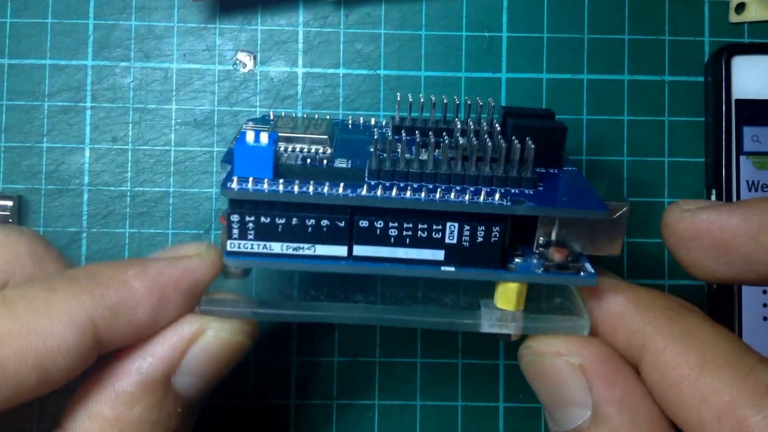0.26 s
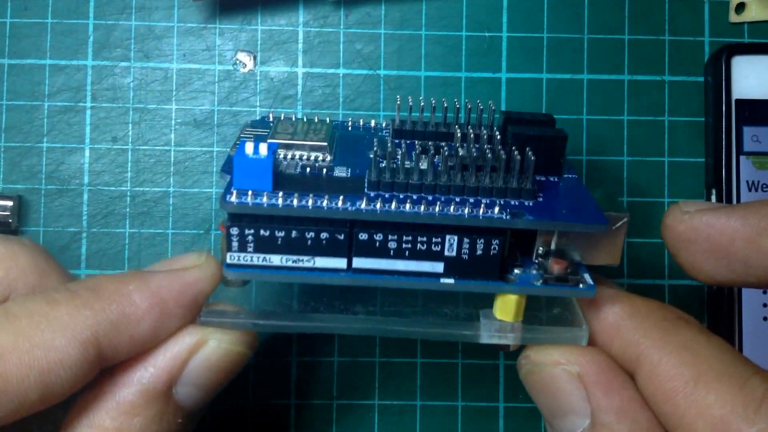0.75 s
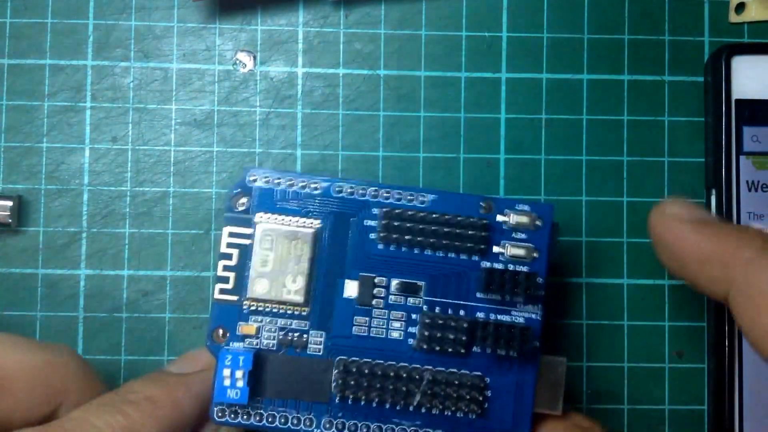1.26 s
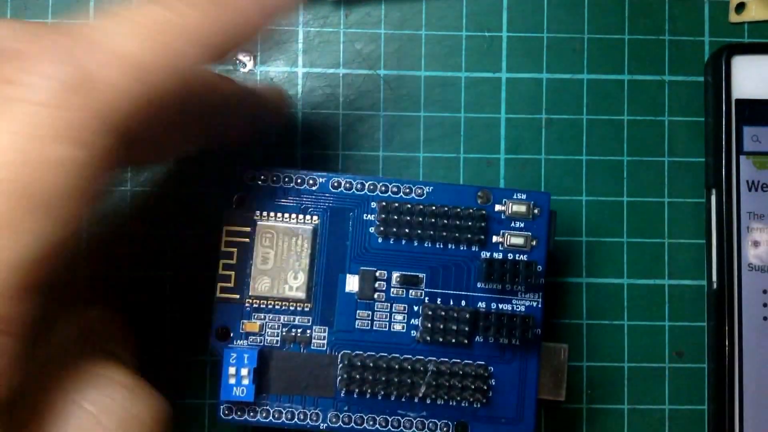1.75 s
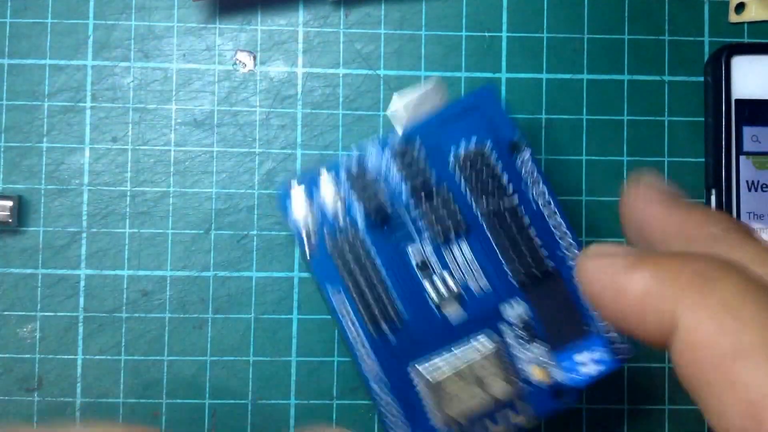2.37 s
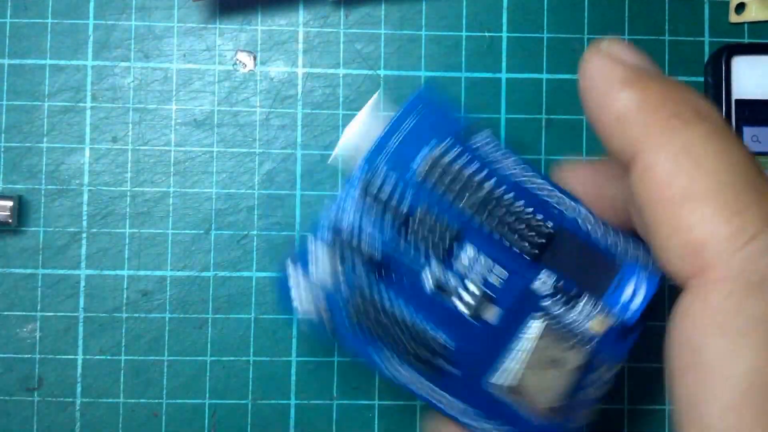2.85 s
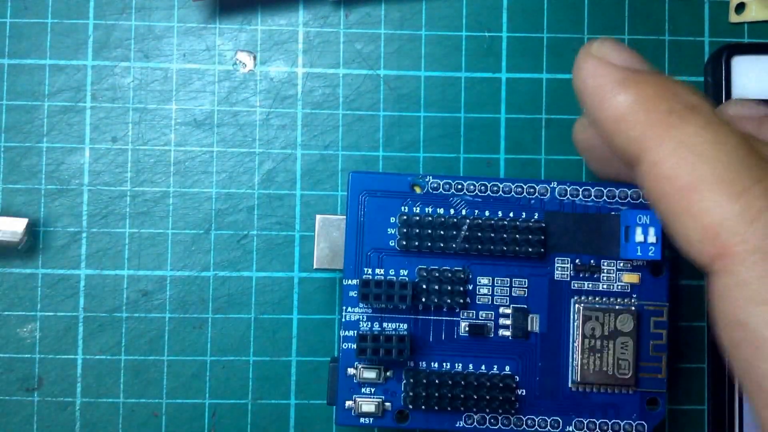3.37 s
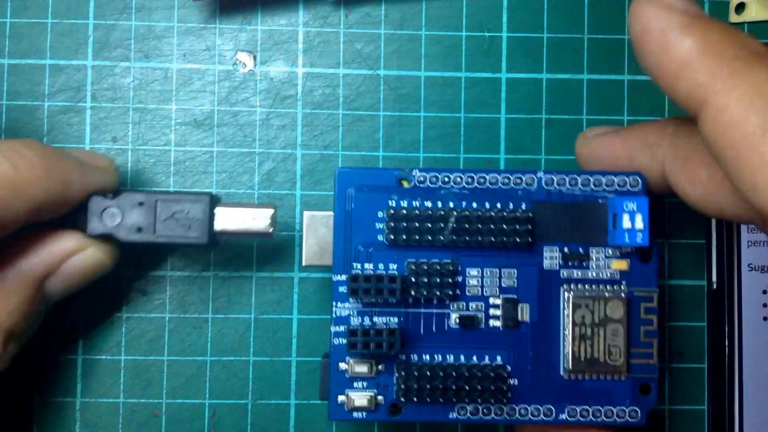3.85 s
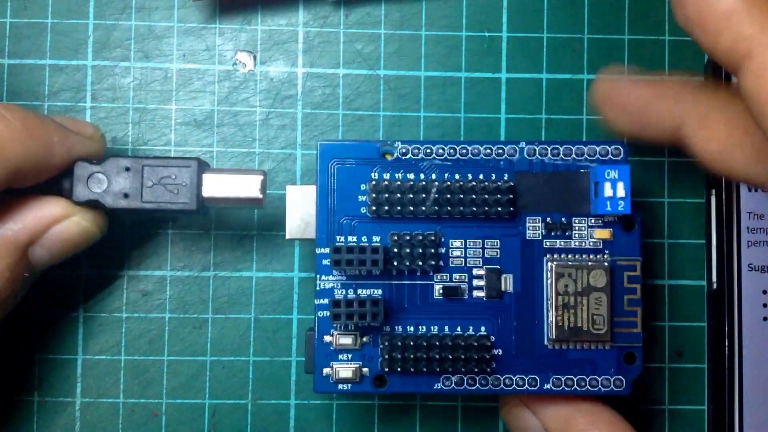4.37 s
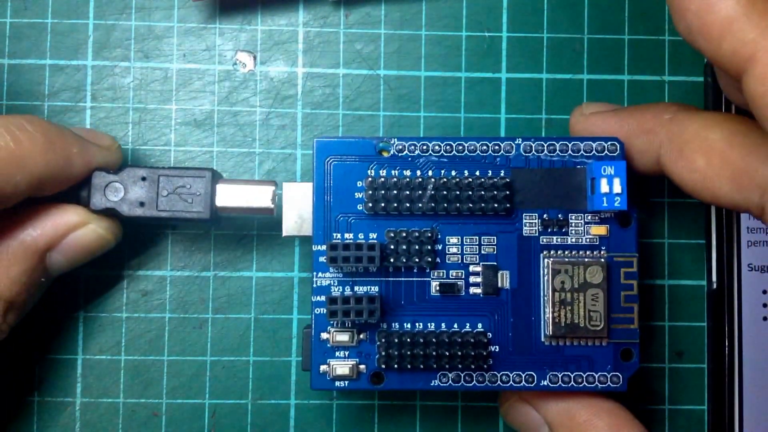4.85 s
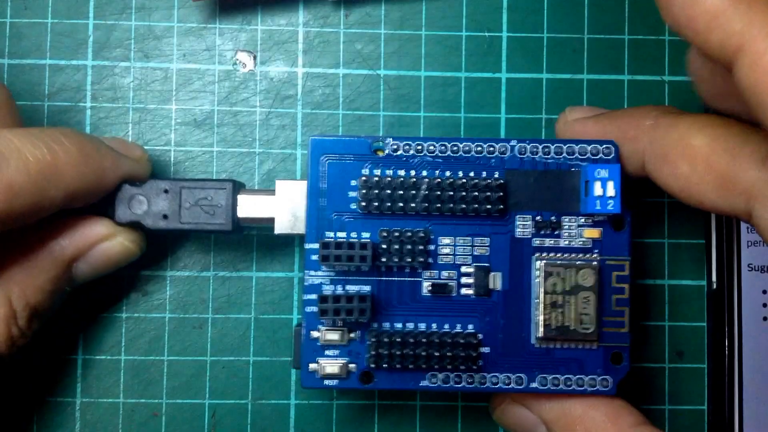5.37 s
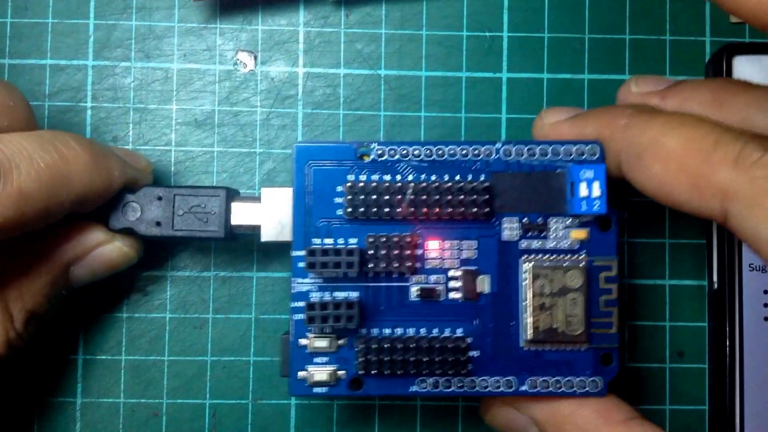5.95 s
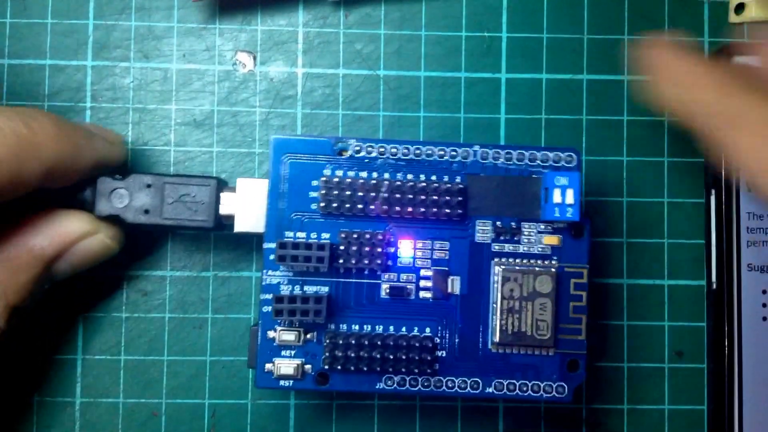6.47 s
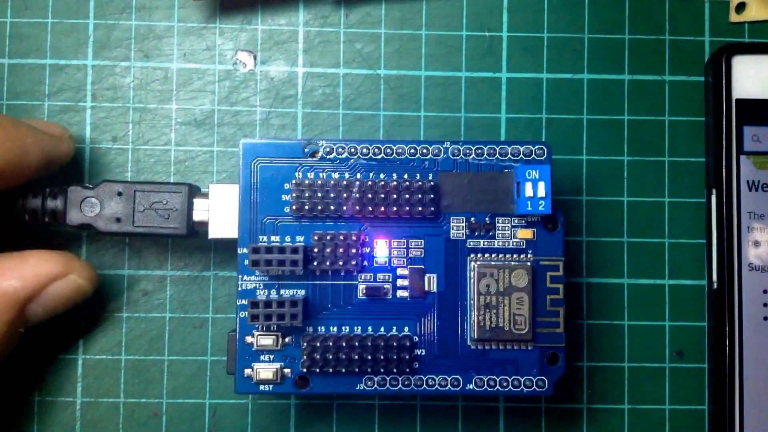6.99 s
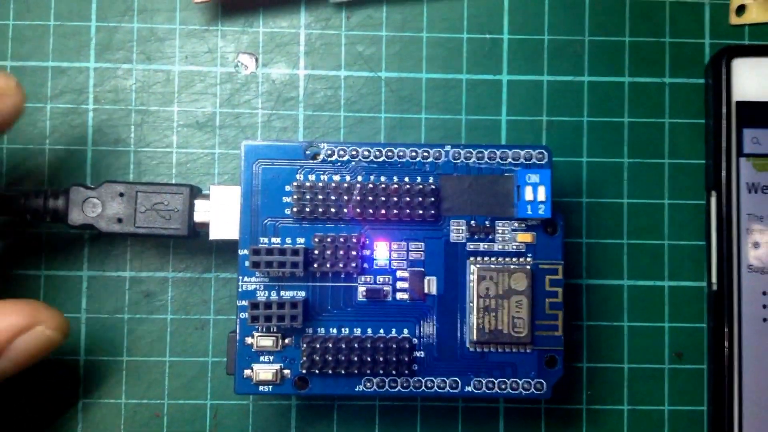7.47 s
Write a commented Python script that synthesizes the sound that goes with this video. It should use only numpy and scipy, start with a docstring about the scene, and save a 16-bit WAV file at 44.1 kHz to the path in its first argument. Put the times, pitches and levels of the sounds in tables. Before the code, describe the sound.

In a small dry room, close to the mat, a low fan hum wavers with soft airy swishes. A circuit board is set down with quick light taps, then turned and slid with gritty scrapes and a hard cluster of knocks, followed by more rubbing. Small ticks come as a cable plug meets the socket, then it snaps home with one loud, bright click. Only the quiet fan remains.

```python
"""Circuit board on a cutting mat, plug snapping home

A small, dry room, with the microphone close to the mat. A fan gives a low, wavering tone, bands of noise
and soft swishes. A circuit board is set down, turned and slid: knocks, taps and scuffs are short contacts
that ring its resonances, its slides are dense tiny slips, its pins hiss. Fingers and a cable plug tick on
small hard parts; the plug is pushed and snaps home with one sharp click that rings plug and socket.
The nearest walls echo briefly.
"""
import sys
import numpy as np
from scipy import signal
from scipy.fft import rfft, irfft
from scipy.io import wavfile
from scipy.ndimage import uniform_filter1d, map_coordinates

SR = 44100
rng = np.random.default_rng(int(sys.argv[2]) if len(sys.argv) > 2 else 0)


def bounce(signal):
    """Save signal as a 16-bit WAV file at the path given by the first command-line argument."""
    frames = np.transpose(np.atleast_2d(signal))
    limited = np.clip(frames, -1, 1)
    pcm = np.round(limited * 32767).astype(np.int16)
    wavfile.write(sys.argv[1], SR, pcm)


N = 340692
TIME = np.arange(N) / SR
FREQS = np.fft.rfftfreq(N, 1 / SR)

# colour of the fan's wash and swishes: (frequency [Hz], relative density [dB per Hz])
SWELL_COLOUR = [(300, -27), (680, 5), (820, 6.5), (1250, 7), (1600, -4.5), (2600, -33), (6000, -62)]


def gain_of(db):
    """Decibels to amplitude."""
    return 10 ** (np.asarray(db) / 20)


def evened(x):
    """Scales to rms 1."""
    return x / np.sqrt(np.mean(x ** 2) + 1e-20)


def unit(x):
    """Scales to energy 1."""
    return x / np.linalg.norm(x)


def read(points, hz):
    """Reads a spectrum table on a log-frequency axis."""
    f, value = np.transpose(points)
    return np.interp(np.log(hz + 1), np.log(f + 1), value)


def add(mix, s, sound):
    """Mixes a sound in at time s."""
    part = mix[round(s * SR):][:len(sound)]
    part += sound[:len(part)]


def coloured(x, gain):
    """Filters a full-length signal; rms 1."""
    return evened(irfft(rfft(x) * gain, N))


def coloured_noise(gain):
    """Full-length noise with the given spectrum; rms 1."""
    return coloured(rng.standard_normal(N), gain)


def waver(rate_hz):
    """Slow chance up to a given rate; rms 1."""
    return coloured_noise(np.exp(-(FREQS / rate_hz) ** 2))


def causal(x, db_at, size=4096):
    """Filters by a gain in dB over frequency, with nothing ahead of the attack (minimum phase)."""
    log_gain = np.log(gain_of(db_at(abs(np.fft.fftfreq(size, 1 / SR)))))
    taps = np.fft.ifft(np.exp(np.conj(signal.hilbert(log_gain)))).real
    return signal.fftconvolve(x, taps[:size // 2])[:len(x)]


def treble(hz, bright_hz=3970):
    """Share (0-1) of a frequency in the range that only hard contact excites."""
    return 1 - 1 / (1 + (hz / bright_hz) ** 16)


def tilted(tilt_db):
    """A slope in dB per octave above 1 kHz, set by the hardness of the touch."""
    return lambda hz: tilt_db * np.log2(np.maximum(hz, 1000) / 1000)


def favour(x, hz, lift_db, octaves):
    """Lifts one range of a sound and keeps its energy."""
    lifted = causal(x, lambda f: lift_db / (1 + (np.log2((f + 1) / hz) / octaves) ** 2))
    return np.linalg.norm(x) * unit(lifted)


def air(hiss_db=-69.0, wash_db=-77.5, restless_db=2, restless_hz=3):
    """Steady hiss and a soft, restless wash; the recorder's gain control ducks both after the loud snap."""
    # room air and microphone hiss: (frequency [Hz], relative density [dB per Hz])
    hiss_colour = [(20, -19), (50, -20), (80, -3), (150, 4.5), (290, 5), (340, 1.5), (550, 0.5),
                   (670, -9.5), (1150, -9.5), (1750, -11), (2600, -10.5), (3500, -12), (5200, -17.5),
                   (15000, -21)]
    duck_s, duck_length_s, duck_db = 6.32, 0.39, -2.5  # a set ramp, then held
    ducking = gain_of(duck_db * np.clip((TIME - duck_s) / duck_length_s, 0, 1))
    hiss = gain_of(hiss_db) * coloured_noise(gain_of(read(hiss_colour, FREQS)))
    wash_gain = gain_of(wash_db + restless_db * waver(restless_hz))
    wash = wash_gain * coloured_noise(gain_of(read(SWELL_COLOUR, FREQS)))
    return ducking * (hiss + wash)


def fan_hiss(hz=2050, width_hz=170, restless_db=3.0, restless_hz=4, level_db=-81.0):
    """A faint, diffuse band of hiss in the fan's air comes and goes."""
    band = coloured_noise(1 / (1 + (1.4 * (FREQS - hz) / width_hz) ** 2))
    return gain_of(level_db) * evened(band * gain_of(restless_db * waver(restless_hz)))


def fan():
    """Narrow bands of turbulence make a restless hum."""
    # the fan's hum beside its main tone: (frequency [Hz], width [Hz], level [dB rms])
    bands = [(65.62, 2.7, -85), (102.3, 4, -72.5), (116.9, 3.7, -70), (163, 6.5, -80.5), (182, 6, -78.5),
             (200, 16, -72.5), (233.3, 44, -66), (263, 18, -63), (379, 5.9, -83.5), (498, 4, -86.5),
             (550, 10, -85), (805, 24, -83.5), (925, 15, -98), (1160, 16, -85.5), (1345, 24.6, -84.5),
             (1540, 70, -87.5)]
    power = 0
    for hz, width, db in bands:
        shape = unit(1 / (1 + (1.4 * (FREQS - hz) / width) ** 2))
        power = power + gain_of(db) ** 2 * shape ** 2
    phases = np.exp(2j * np.pi * rng.random(len(FREQS)))
    return np.sqrt(power.sum()) * evened(irfft(np.sqrt(power) * phases, N))


def drone(hz=222, wander_hz=3.7, wander_rate_hz=14, flutter=0.37, flutter_hz=14, level_db=-3.0):
    """The fan's strongest tone, unsteady in pitch and strength."""
    # its slow wavering, ahead of the trim level_db: (time [s], level [dB])
    wavering = [(0.15, -50), (0.5, -55.5), (0.8, -49), (1.05, -56), (1.45, -49.5), (1.9, -54), (2.3, -48.5),
                (2.75, -60), (3.1, -50.5), (3.6, -56), (3.998, -53.5), (5.0, -51), (5.8, -53), (6.4, -52.5),
                (6.8, -57), (7.2, -51)]
    phase = 2 * np.pi * np.cumsum(hz + wander_hz * waver(wander_rate_hz)) / SR
    level = gain_of(level_db + np.interp(TIME, *np.transpose(wavering)))
    return level * evened((1 + flutter * waver(flutter_hz)) * np.sin(phase))


def swishes(half_s=0.057, fall_octaves_per_s=1.8):
    """Each sweep of the fan is a soft midrange swell that falls in pitch as it passes."""
    # mostly about 0.44 s apart: (time of the peak [s], level [dB])
    sweeps = [(.04, -68.5), (.52, -68), (.92, -70.5), (1.35, -69), (1.8, -69.5), (2.66, -72.5),
              (3.1, -72.5), (3.55, -68.5), (3.98, -70), (4.42, -71), (4.86, -69), (5.3, -69), (5.72, -72.5),
              (6.57, -76), (7.03, -71), (7.46, -69)]
    out = np.zeros(N)
    t = np.arange(-SR // 4, SR // 4) / SR
    for s, db in sweeps:
        hz, times, z = signal.stft(rng.standard_normal(len(t)), SR, nperseg=1024)
        sunk_hz = hz[:, None] * 2 ** (fall_octaves_per_s * (times + t[0]))
        noise = signal.istft(z * gain_of(read(SWELL_COLOUR, sunk_hz)), nperseg=1024)[1][:len(t)]
        swish = evened(noise) * np.exp(-(t / half_s) ** 2 / 2)
        add(out, max(s + t[0], 0), gain_of(db) * swish[s + t >= 0])
    return out


def room(x, tail_db=-24, wall_spread_s=0.0027):
    """Clusters of echoes from the nearest walls over a short tail; each band dies at its own speed."""
    # room decay: (frequency [Hz], time to fall 60 dB [s])
    decay = [(200, .3), (1000, 0.24), (3500, 0.2), (5600, 0.226), (10000, 0.2257), (15000, 0.16)]
    # echoes from the nearest walls: (delay [s], level [dB])
    walls = [(.016, -26), (0.032, -33.5), (.054, -41)]
    t = np.arange(SR // 2) / SR
    hz, times, z = signal.stft(rng.standard_normal(len(t)), SR, nperseg=256)
    fading = gain_of(-60 * times / read(decay, hz)[:, None])
    tail = signal.istft(z * fading, SR, nperseg=256)[1][:len(t)]
    response = gain_of(tail_db) * unit(tail * np.minimum(t / .006, 1))  # the tail builds up over 6 ms
    for s, db in walls:
        cluster = rng.standard_normal(len(t)) * np.exp(-((t - s) / wall_spread_s) ** 2 / 2)
        response = response + gain_of(db) * unit(cluster)
    return signal.fftconvolve(x, response)[:N]


def strokes(brake_law=1.88):
    """Each push speeds the board up evenly and brakes it; yields speed and braking (0-1) and its levels."""
    # pushes over the mat: (start [s], time to top speed [s], time to rest [s], level at top speed [dB],
    # weight of the lows [dB], weight of the treble [dB], hiss of the pins at top speed [dB])
    pushes = [(1.055, 0.014, .06, -68, 11.5, 1, -88), (1.275, 0.02, 0.13, -64.5, 4, 2, -81),
              (1.389, 0.037, 0.27, -71.5, 14, 2, -71), (1.84, 0.062, 0.075, -69.5, 11, 10, -79),
              (1.91, 0.061, 0.13, -50.5, -1, -8, -60), (1.96, 0.19, 0.25, -46.5, 2, 0, -56),
              (2.07, .08, 0.063, -53, -10, -10, -70), (2.224, 0.026, 0.076, -69, 19, 15, -82),
              (2.403, 0.029, 0.081, -46.5, 3.5, -2, -61), (2.786, 0.095, 0.12, -48, 2, -4, -52),
              (2.89, 0.061, 0.1, -45.5, 2.5, -4, -70), (3.369, 0.01, 0.026, -58, 8, -5, -72),
              (3.3, 0.074, 0.51, -72, 12, -1, -77), (5.0, 0.031, 0.28, -74, 6, -3, -85)]
    for start, rise, fall, *levels in pushes:
        pushing = np.clip((TIME - start) / rise, 0, 1)
        braking = np.clip((TIME - start - rise) / fall, 0, 1)
        # a law over 1 drops the speed fast at first, then the board creeps to rest
        yield pushing * (1 - braking) ** brake_law, braking, *levels


def catches(let_go_s=0.0047):
    """Gain of the drag: it changes briefly at some moments, mostly a surge that quickly lets go."""
    # pins and mat: (time [s], level against the steady drag [dB])
    snags = [(1.9647, 0), (2.0655, 2), (2.1174, 4.5), (2.1408, 5.5), (2.1836, 6.5), (2.2251, 3.5),
             (2.4187, -2), (2.8218, 5.5), (2.8527, 2), (2.8866, 2), (2.9295, 0)]
    return 1 + sum((gain_of(db) - 1) * (TIME >= s) * np.exp(-abs(TIME - s) / let_go_s) for s, db in snags)


def patches(depth_db, x, size=10, order=7):
    """Lets the spectrum shift in random patches, as the point of contact wanders."""
    z = signal.stft(x, nperseg=256)[2]
    field = uniform_filter1d(rng.standard_normal(z.shape), size, 1)  # smooth over time
    field = evened(uniform_filter1d(field, order, 0))  # and over frequency
    return evened(signal.istft(z * gain_of(depth_db * field), nperseg=256)[1][:N])


def drifting(x, share, rate_hz):
    """Lets all resonances drift by a small share of their frequency, as the grip changes."""
    return map_coordinates(x, [np.cumsum(1 + share * waver(rate_hz))], order=3, mode="wrap")


def rubbing(slips_per_s=2600, smooth=0.8, judder_db=0.74, judder_hz=120, heavy_hz=1700, wander_db=2.0,
            drift=.012, drift_hz=9, speed_law=1.01):
    """Tiny slips on the mat's grain sound through the board; pressure deepens, sharp edges brighten them."""
    # colour of the rubbing: (frequency [Hz], relative density [dB per Hz])
    colour = [(100, 0), (350, -1.5), (650, -7.5), (950, 2), (1400, -1), (1900, 0.5), (2700, 1.5),
              (3800, -3.5), (4300, -8.5), (6000, -19), (9500, -21.5), (12700, -21), (15000, -18)]
    # peaks and dips on that colour: (frequency [Hz], width [Hz], height [dB])
    peaks = [(893, 47, 4.5), (1147, 36, 8), (1340, 320, -8.5), (2910, 180, 6), (3620, 100, 2.5),
             (4370, 300, -0.5), (4850, 140, 11), (5510, 220, 10), (5760, 300, -3), (6200, 200, 7),
             (6660, 320, -3), (7360, 530, 15), (8000, 170, -5), (8720, 460, 13.5), (9550, 190, 12),
             (10400, 400, -0.5), (10550, 300, 10), (11900, 280, 12), (13305, 660, -8)]
    sizes = gain_of(2.6 * np.minimum(rng.exponential(1, N), 4))
    slips = (rng.random(N) < slips_per_s / SR) * rng.choice([-1, 1], N) * sizes
    colour_db = read(colour, FREQS)
    for hz, width, db in peaks:
        colour_db = colour_db + db / (1 + (2 * (FREQS - hz) / width) ** 2)
    friction = patches(wander_db, evened(slips) + smooth * rng.standard_normal(N))
    scrape = drifting(coloured(friction, gain_of(colour_db)), drift, drift_hz)
    lows = irfft(rfft(scrape) / (1 + (FREQS / heavy_hz) ** 4), N)
    highs = irfft(rfft(scrape) * treble(FREQS), N)
    drag = 0
    for speed, _, db, lows_db, highs_db, _ in strokes():
        weighted = scrape + lows * (gain_of(lows_db) - 1) + highs * (gain_of(highs_db) - 1)
        drag = drag + gain_of(db) * speed ** speed_law * weighted  # friction grows with speed
    return drag * catches() * gain_of(judder_db * waver(judder_hz))


def pins(speed_law=0.27, lift_db=19):
    """The pins hiss on the mat even at a crawl, and fade as the board brakes and they lift off."""
    # bands of their hiss: (frequency [Hz], width [Hz], relative level [dB])
    bands = [(2770, 530, -5.5), (3640, 170, -10)]
    hiss = 0
    for hz, width, db in bands:
        hiss = hiss + gain_of(db) * coloured_noise(1 / (1 + (2.0 * (FREQS - hz) / width) ** 2))
    level = sum(gain_of(pins_db - lift_db * braking) * speed ** speed_law
                for speed, braking, *_, pins_db in strokes())
    return hiss * level


def grazes():
    """Short, light strokes: friction noise in a single resonance."""
    # fingers and pins: (time of the middle [s], length [s], level [dB], resonance [Hz], width [Hz])
    light_strokes = [(1.079, 0.034, -65.5, 2250, 900), (1.09, 0.077, -69, 980, 500),
                     (1.223, .06, -73.5, 2750, 800), (1.3, 0.047, -65, 2930, 440),
                     (1.847, .01, -67.5, 3140, 900), (1.88, .08, -68, 3550, 200),
                     (1.902, 0.022, -77, 4600, 1800), (1.944, .03, -60, 2900, 1000),
                     (2.143, 0.015, -55, 4500, 900), (2.257, 0.029, -50.5, 1300, 700),
                     (2.278, .03, -61, 4580, 800), (2.3, .06, -61, 3640, 300),
                     (2.797, 0.018, -59.5, 2800, 800), (2.83, 0.022, -55, 3070, 1200),
                     (2.92, .11, -57, 4850, 450), (2.991, .025, -55.5, 2700, 1600),
                     (3.342, 0.015, -66, 830, 250), (3.385, 0.02, -66, 2060, 1100),
                     (3.387, .02, -63, 800, 160), (3.545, .03, -72, 1650, 500),
                     (3.6, .05, -79, 10000, 5000), (4.51, 0.12, -74, 2670, 1700),
                     (5.044, 0.087, -78, 3670, 4000), (6.12, 0.045, -68.5, 1250, 600),
                     (6.15, 0.028, -66, 2140, 2420), (6.47, .014, -77, 3630, 900),
                     (6.74, .07, -79, 2180, 250)]
    out = np.zeros(N)
    for s, length, db, hz, width in light_strokes:
        t = np.arange(-2 * length, 2 * length, 1 / SR)
        resonance = signal.iirpeak(hz, hz / width, fs=SR)
        hiss = signal.filtfilt(*resonance, rng.standard_normal(len(t)), padlen=0)
        add(out, s + t[0], gain_of(db) * evened(hiss) * np.exp(-(2 * t / length) ** 4))
    return out


def burst(contact_s, t60, rattle, size):
    """A very short contact and a brief chatter of the two surfaces, its spectrum roughly evened out."""
    t = np.arange(size) / SR
    contact, chatter = rng.standard_normal((2, size))
    x = unit(contact * np.exp(-(t / contact_s) ** 2)) + rattle * unit(chatter * gain_of(-60 * t / t60))
    power = uniform_filter1d(abs(np.fft.fft(x)) ** 2, size=25, mode="wrap")
    return causal(x, lambda f: -10 * np.log10(power + .2 * power.mean()), size=size)


def blow(modes, colour, contact_s, crack_db, crack_t60, rattle, tone_db, detune, ring=1, size=8192):
    """One contact: a spike and its chatter drive the part's resonances; ring scales how long they last."""
    f = abs(np.fft.fftfreq(size, 1 / SR))
    power = 0
    for hz, db, t60 in modes:
        centre = hz * (1 + detune * rng.normal())
        half_width = np.log(1000) / (2 * np.pi * t60 * ring)  # a longer ring is a narrower peak
        resonance = 1 + ((f ** 2 - centre ** 2) / (2 * centre * half_width)) ** 2
        power = power + (gain_of(db) * t60) ** 2 / resonance
    crack = gain_of(crack_db) * unit(gain_of(read(colour, f)))
    body = np.hypot(unit(np.sqrt(power)), crack)
    strike = burst(contact_s, crack_t60 * ring, rattle, size)
    sound = causal(strike, lambda hz: 20 * np.log10(body) + tone_db(hz), size=size)
    return unit(sound) * np.sqrt(SR / 200)  # the energy of 5 ms at rms 1


def knocks(thud_hz=1300, lift_octaves=0.26):
    """Knocks, taps and scuffs ring the board: some drive the low modes, fingers damp the ring."""
    # contacts: (time [s], level [dB], treble from hard contact [dB], weight of the low thud [dB],
    # range that the struck spot favours [Hz], its lift [dB], relative ring time)
    contacts = [(1.4159, -39.5, -22, 1, 2630, 6, .45), (1.4427, -37, 0.5, 4, 2980, 13, 0.78),
                (1.4463, -38, -11.5, 1.5, 2900, -1, 0.67), (1.4508, -45.5, -19, 7, 1500, 2, 0.52),
                (2.159, -44, -7, 6, 2965, 6, .8), (2.2485, -45, -16.5, 16, 1300, 11, 1.8),
                (2.257, -44, -16, 17, 590, 15, 2.5), (2.3567, -29.5, -7.5, 7, 2800, 8, 1.5),
                (2.3622, -28.5, -1.5, 24, 3740, 12.5, 1.4), (2.3653, -31, -8, 14, 790, 19, 0.8),
                (2.3772, -33.5, -7, 7, 3170, 7, 1.16), (2.3850, -43.5, 3, 11, 890, 11, 0.75),
                (2.930, -46.5, -8, -10, 2700, 12, .8), (2.9432, -48, -3, 3, 4700, 21, .7),
                (2.9565, -43, -16, 5, 2150, 12, 0.8), (2.977, -46, -8, -8, 2300, 9, 1.2),
                (3.3735, -52.5, -16, 5, 820, 16, 1.9), (3.444, -54, -14, 6, 790, 25, 1.4),
                (4.4160, -41, -12.5, -2, 1950, 8, 0.56), (4.4190, -46.5, -12, 13, 960, 10, .8),
                (4.4226, -49, -12, 10, 510, 11, 1.1), (6.3404, -54.5, -24, -3, 2800, -1, 0.75)]
    # what the board rings with: (frequency [Hz], relative level [dB], nominal time to fall 60 dB [s])
    board_modes = [(216, -6, 0.22), (374, -5.5, 0.068), (510, 2, 0.02), (602, -12, 0.12), (787, -4, 0.033),
                   (906, -1, 0.044), (1125, -3, 0.083), (1697, 4, 0.027), (1980, -13, 0.054),
                   (2210, -0.5, 0.041), (2830, 4.5, 0.022), (3570, 2.5, 0.031), (4970, 0, 0.037),
                   (7350, -3, 0.044), (8800, 1, 0.028)]
    # first crack of contact: (frequency [Hz], relative level [dB])
    crack = [(100, 2), (400, -14), (1000, -26), (1400, -5), (2800, 3.5), (3800, -3), (5800, -3),
             (8700, -10), (10500, -17.5), (15000, -26)]
    out = np.zeros(N)
    for s, db, hard_db, thud_db, spot_hz, lift_db, ring in contacts:
        modes = [(hz, level + thud_db * (hz < thud_hz), t60) for hz, level, t60 in board_modes]
        knock = blow(modes, crack, contact_s=0.00058, crack_db=-4.0, crack_t60=0.035, rattle=0.69,
                     tone_db=lambda f: hard_db * treble(f), detune=0.019, ring=ring)
        add(out, s, gain_of(db) * favour(knock, spot_hz, lift_db, lift_octaves))
    return out


def touches(lift_octaves=0.12):
    """Fingers and plug: light ticks on small hard parts; in each, one resonance stands out."""
    # the tick at 4.4168 s belongs to a tap on the board: (time [s], level [dB],
    # treble tilt [dB per octave], resonance that stands out [Hz], its lift [dB])
    ticks = [(1.285, -55.5, 8, 2950, 25), (4.4168, -54, 3, 4750, 17), (4.9975, -43, -1, 4950, 18),
             (4.9982, -42.5, -3, 1520, 11), (5.0012, -54, -2, 850, 21), (5.032, -65, -4, 2650, 18),
             (5.125, -58, -8, 1720, 5), (5.127, -58, -9, 950, 10), (5.143, -68, 9, 10000, 19),
             (5.447, -67.5, 4, 7400, 7), (6.015, -62, 3, 3620, 7)]
    # what the small parts ring with: (frequency [Hz], relative level [dB], time to fall 60 dB [s])
    small_modes = [(1484, -3, 0.016), (1610, 5, 0.016), (2290, 0, 0.012), (2904, -1, .01),
                   (3560, -0.5, 0.036), (4600, -1, 0.0096), (4950, -12, 0.014), (5445, -7.5, 0.037),
                   (7930, -13, 0.018), (8580, -6, .013)]
    # first crack of contact: (frequency [Hz], relative level [dB])
    crack = [(100, -40), (900, -15), (1400, -3), (2800, 1), (5600, -19), (6500, -9), (12500, -12),
             (15000, -18)]
    out = np.zeros(N)
    for s, db, tilt_db, hz, lift_db in ticks:
        tick = blow(small_modes, crack, contact_s=.001, crack_db=-6.5, crack_t60=0.016, rattle=1.5,
                    tone_db=tilted(tilt_db), detune=0.0017)
        add(out, s, gain_of(db) * favour(tick, hz, lift_db, lift_octaves))
    return out


def plug(spray_db=5, spray_dull_db=0.7):
    """The plug slips past the springs, hits home and rebounds; returns near sound and spray to the room."""
    # scrape, snap and rattle: (time [s], level [dB], treble tilt [dB per octave])
    contacts = [(6.1619, -41, 1.5), (6.1632, -26.5, 5), (6.1642, -12, 1), (6.1672, -28.5, 4),
                (6.1692, -32, -1), (6.1785, -42, 2), (6.182, -41, -1), (6.187, -46.5, 1),
                (6.202, -48.5, -2)]
    # plug and socket as they lock: (frequency [Hz], relative level [dB], time to fall 60 dB [s])
    shell_modes = [(295, -22, 0.035), (790, -18.5, 0.03), (991, -13, 0.05), (1220, -17, 0.042),
                   (1600, -11, 0.044), (1720, -13, .026), (2080, -9.5, 0.027), (2803, -3.5, 0.014),
                   (3332, 1.5, 0.013), (3560, -2.5, 0.031), (4240, -4, 0.012), (4720, -3, .014),
                   (5200, -2, 0.012), (5400, -4.5, 0.024), (5840, -7.5, 0.017), (6577, -4.5, .012),
                   (7600, -4, 0.011), (8340, 0.5, 0.0072), (9290, -6.5, 0.012), (9940, -3, 0.014),
                   (10890, -15.5, 0.045), (11040, -11.5, 0.03), (13100, -5, 0.0072), (14300, -7.5, .012)]
    # first crack of contact: (frequency [Hz], relative level [dB])
    crack = [(100, -30), (450, -14.5), (1400, 2), (3400, -1.5), (6000, -8), (10000, -6), (12200, -3),
             (15000, -1.5)]
    near, far = np.zeros(N), np.zeros(N)
    for s, db, tilt_db in contacts:
        click = blow(shell_modes, crack, contact_s=.0017, crack_db=-7.5, crack_t60=0.016, rattle=0.98,
                     tone_db=tilted(tilt_db), detune=0.0012)
        add(near, s, gain_of(db) * click)
        # other directions receive another mix of the modes, with more of the crack
        spray = blow(shell_modes, crack, contact_s=0.0009, crack_db=spray_db, crack_t60=0.028, rattle=2.2,
                     tone_db=tilted(tilt_db - spray_dull_db), detune=.015)
        add(far, s, gain_of(db) * spray)
    return near, far


def scene(low_hz=150):
    """Board, plug and fan in the room; such small parts radiate hardly any bass."""
    background = drone() + fan() + swishes() + fan_hiss() + air()
    handling = knocks() + rubbing() + pins() + grazes() + touches()
    snap, spray = plug()
    parts = handling + snap + room(spray + gain_of(4.5) * handling)
    parts = signal.sosfilt(signal.butter(2, low_hz, "high", fs=SR, output="sos"), parts)
    return (parts + background)[None]


def record(dry, edge_hz=15180):
    """The recorder's band limit: a steep low-pass."""
    lowpass = signal.firwin(511, edge_hz, window=("kaiser", 9), fs=SR)
    return signal.oaconvolve(dry, lowpass[None], "same")


dry = scene()
out = record(dry)
bounce(out)
```